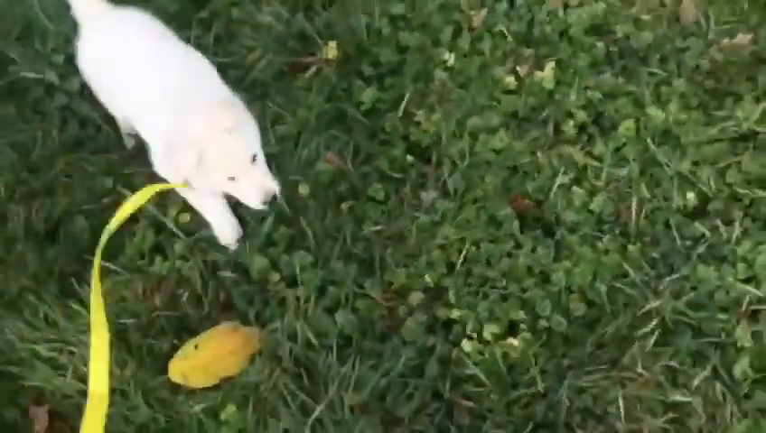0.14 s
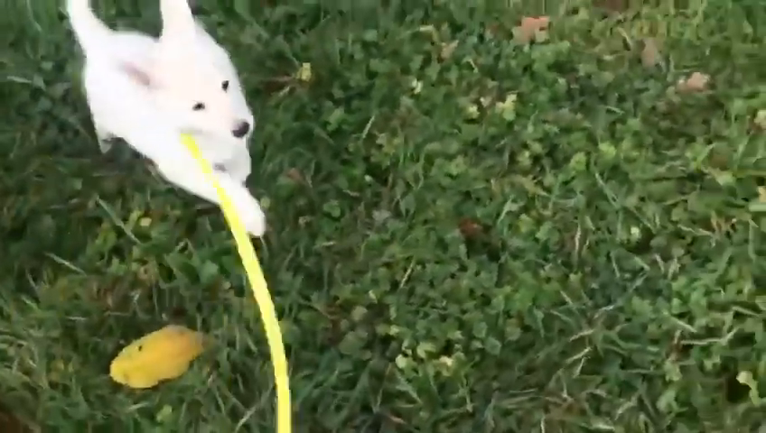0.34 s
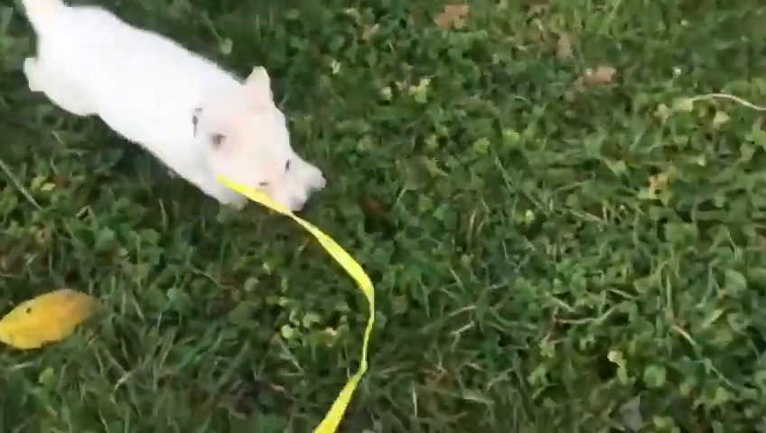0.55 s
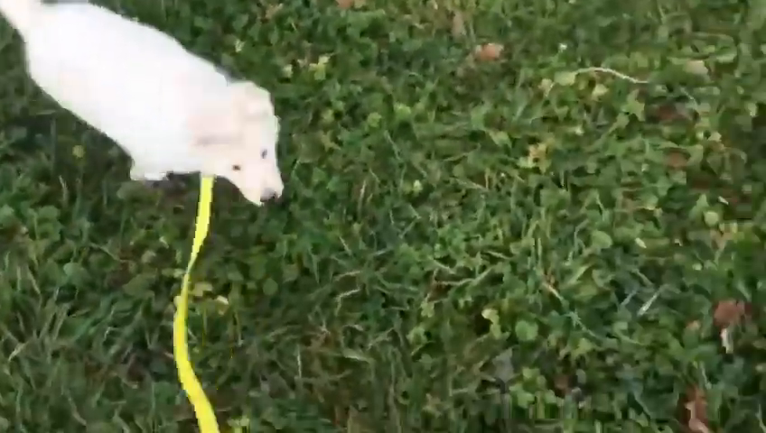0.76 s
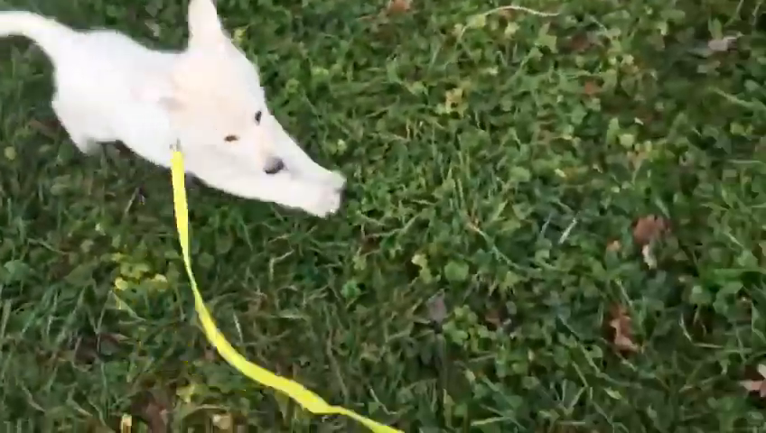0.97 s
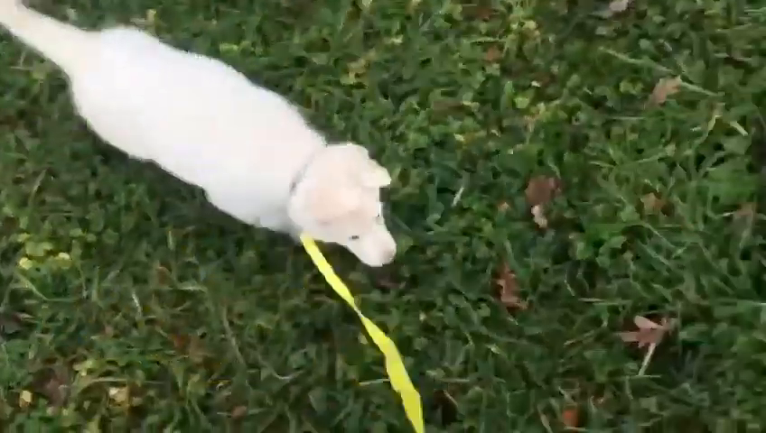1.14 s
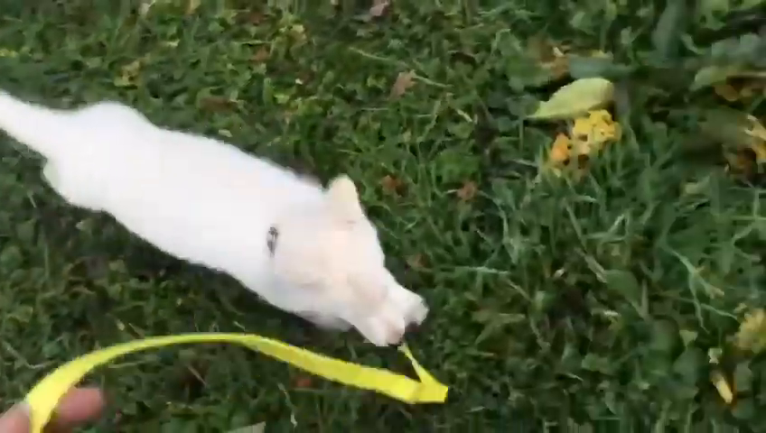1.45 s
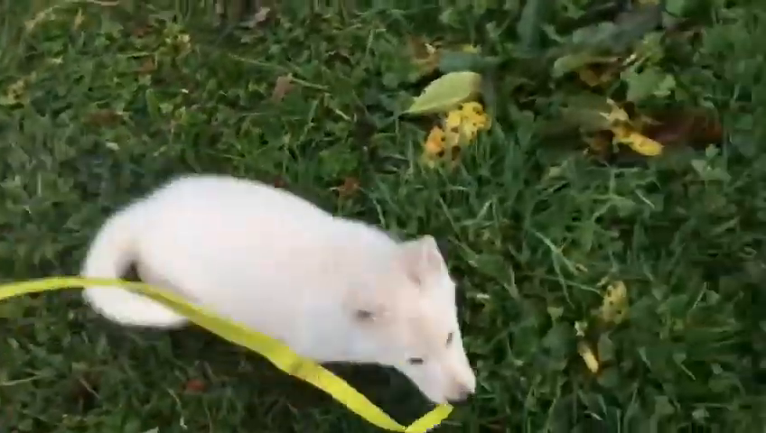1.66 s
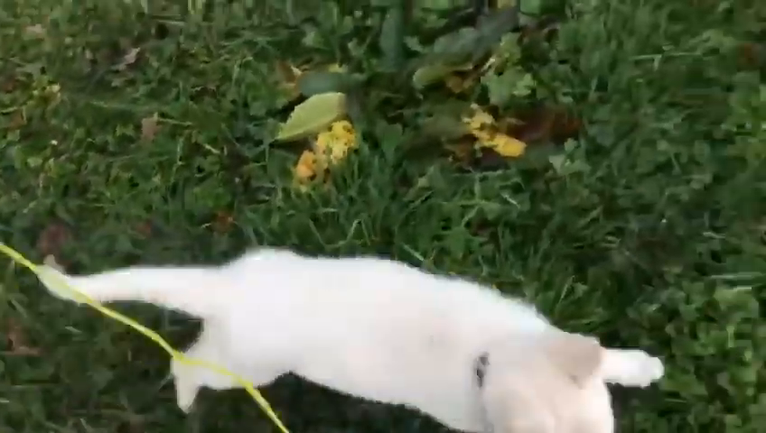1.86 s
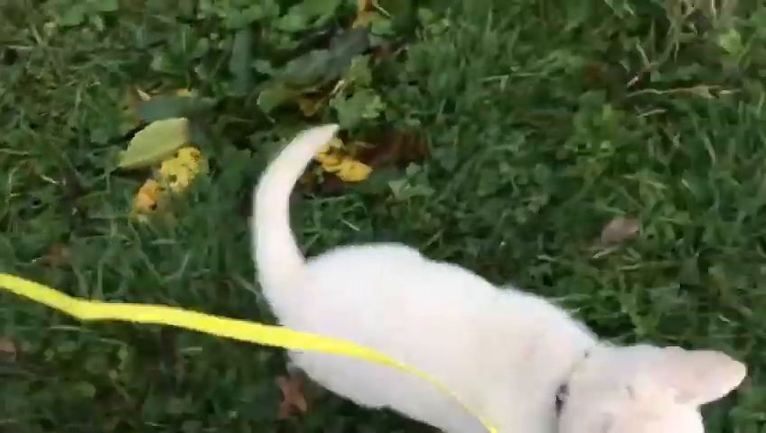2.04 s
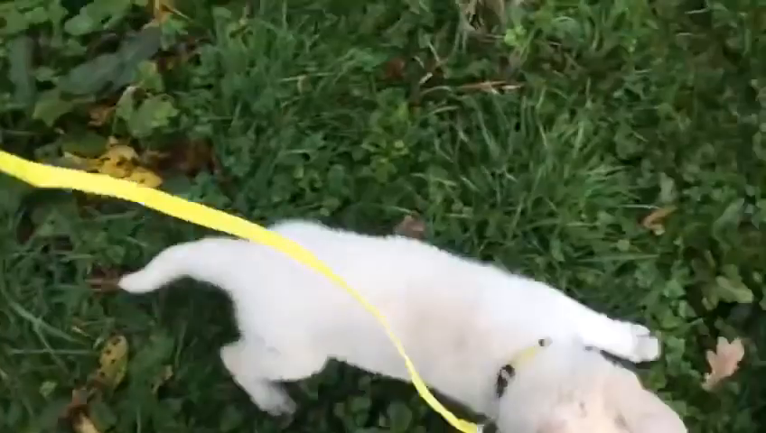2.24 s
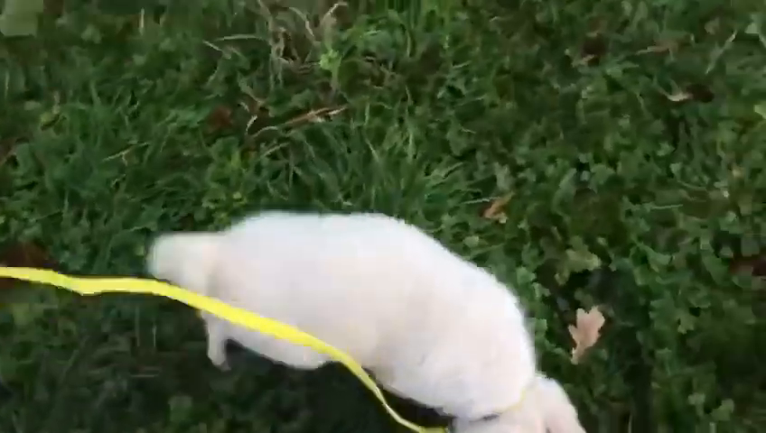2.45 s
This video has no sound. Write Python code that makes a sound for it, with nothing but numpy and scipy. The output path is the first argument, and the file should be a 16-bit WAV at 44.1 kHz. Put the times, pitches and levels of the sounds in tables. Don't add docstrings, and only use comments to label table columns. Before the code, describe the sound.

Dull footsteps thud on grass, close to the microphone. A dense burst of low, soft thumps runs from 0.2 to 0.7 seconds, strongest near 0.2 to 0.3, then weaker treads and light paw falls until 1.4. A firm double thud lands around 1.9. Grass swishes, leaves scrape and stems snap, notably near 0.7, 1.1, 1.5 and 2.3. Distant traffic hums, with a faint wavering motor whine fading after 1.7.

```python
import sys
import numpy as np
from scipy import signal
from scipy.io import wavfile
from scipy.ndimage import uniform_filter1d

SR = 44100
rng = np.random.default_rng(int(sys.argv[2]) if len(sys.argv) > 2 else 0)


def master(y):
    cut = np.clip(np.atleast_2d(y).T, -1, 1)
    pcm = np.round(cut * 32767)
    wavfile.write(sys.argv[1], SR, pcm.astype(np.int16))


def makeup_ratio(level_db):
    decades = np.asarray(level_db, float) / 20
    return 10 ** decades


N = 114660
T = np.arange(N) / SR


def rms_one(x):
    return x / np.sqrt(np.mean(x ** 2) + 1e-20)


def in_time(rows):
    return np.interp(T, *np.transpose(rows))


def at_hz(points, hz):
    table_hz, table_db = np.transpose(points)
    return np.interp(np.log(hz), np.log(table_hz), table_db)


def drift(rate_hz):
    r = np.exp(-40 * np.pi * rate_hz / SR)
    noise = rng.standard_normal(N // 20 + 2002)
    slow = rms_one(signal.lfilter([1], [1, -2 * r, r * r], noise)[2000:])
    return np.interp(np.arange(N) / 20, np.arange(len(slow)), slow)


def resonate(x, hz, width_hz):
    r = np.exp(-np.pi * width_hz / SR)
    feed = np.array([1, 0, -1]) * (1 - r * r) / 2
    return signal.lfilter(feed, [1, -2 * r * np.cos(2 * np.pi * hz / SR), r * r], x)


def resonate_twice(x, hz, width_hz):
    return resonate(resonate(x, hz, width_hz), hz, width_hz)


def bands(sources):
    edges = 30 * 2 ** np.arange(0, 8.9, 1 / 3)
    out = []
    for k, (low_hz, high_hz) in enumerate(zip(edges, edges[1:])):
        sos = signal.butter(2, [low_hz, high_hz], "band", fs=SR, output="sos")
        out.append((np.sqrt(low_hz * high_hz), signal.sosfilt(sos, sources[k % 2])))
    return out


def lump(s, hz, cycles):
    turn = (T[::10] - s) * hz
    no_push = np.exp(-2 * (np.pi * cycles) ** 2)
    return np.exp(-0.5 * (turn / cycles) ** 2) * (np.cos(2 * np.pi * turn) - no_push)


# time_s, peak_db, pitch_hz, push (1) or
FOOTFALLS = [(0.172, -37, 128, -0.84), (0.1971, -18, 92, 0.87), (0.2369, -28.5, 84, 0.74),
             (0.2571, -20.5, 136, 1), (0.2692, -19.5, 71.5, -1), (0.2763, -26.5, 61, 0.97),
             (0.246, -34, 90, 1), (0.3284, -33, 61.4, -1), (0.3346, -34, 70, 0.9), (.3487, -27.5, 80.6, 0.95),
             (0.4107, -28, 79.4, -0.83), (0.4359, -23.5, 124, 0.72), (0.455, -24.5, 90.5, -0.89),
             (0.483, -27.5, 98, -0.68), (0.5069, -34, 100, 0.94), (.5236, -41, 110, 0.87),
             (0.5350, -42, 120, 0.91), (0.5715, -29, 65, 0.75), (.594, -28.5, 118, 0.83),
             (.623, -31.5, 138, 0.95), (0.6402, -32.5, 110, 1), (0.6477, -33, 120, 1),
             (0.6604, -27.5, 113, -0.91), (.666, -36, 85, 1), (0.727, -37, 94, 0.91), (0.7841, -44, 100, 0.88),
             (0.909, -43.5, 117, 0.88), (0.974, -39, 89, -1), (0.998, -36, 100, -1), (1.0084, -37, 108, 0.85),
             (1.0641, -36.5, 84, -0.91), (1.083, -40, 60, -1), (1.142, -41, 85, -0.84),
             (1.1519, -35, 64, 0.86), (1.164, -42, 70, 1), (1.2126, -36.5, 90.5, 0.88),
             (1.219, -38, 72, -0.89), (1.3963, -37, 86, 0.8), (1.401, -41, 101, -1), (1.9089, -29, 74, -1.04),
             (1.9215, -23, 113, -0.97), (2.0816, -33.5, 87.6, -0.83), (2.444, -45, 90, -0.67),
             (2.449, -37, 68.6, 0.9), (2.5367, -45, 100, 0.83), (2.54, -41.5, 89, -0.95),
             (0.058, -38, 80.4, 0.62), (0.138, -37, 85, -0.75), (0.3724, -46, 89, 1),
             (1.6216, -49.5, 100, 1), (1.043, -42, 105, 1), (1.435, -54, 70, -0.75),
             (1.194, -39.5, 106, -1), (1.2418, -38, 104, 1), (1.309, -47, 110, 0.87), (1.362, -39, 108, 1),
             (1.448, -41, 69, -1.05), (1.645, -41, 65, -1.1), (1.733, -45, 100, -0.94),
             (1.772, -42, 89, -1), (1.788, -49, 94, -0.84), (1.868, -46, 70, -0.83),
             (1.9, -34.5, 107, -1.17), (1.943, -40, 70, 1), (2.023, -47, 89.5, -0.89), (2.126, -42, 60, 1),
             (2.408, -44, 121, 0.92), (2.4812, -37, 133, -0.88), (2.4923, -43, 90, 0.92),
             (2.515, -38.5, 123, -0.83)]
# time_s, peak_db, pitch_hz
HARD_KNOCKS = [(.2610, -45, 430), (0.342, -39, 187), (0.464, -40.5, 327), (0.475, -36.5, 207),
               (.5300, -44, 171), (.6210, -40, 433), (.6220, -39.5, 257), (1.4650, -48, 516),
               (1.9150, -38, 490), (1.92, -41.5, 348)]
THUD_CYCLES, KNOCK_CYCLES = 0.33, 1.26
EDGE_DB, EDGE_RATIO = -18.5, 3.45
WEIGHT_DB, WEIGHT_RATIO = -7, 0.63


def thuds():
    low = 0
    for s, db, hz, way in FOOTFALLS:
        body = lump(s, hz, THUD_CYCLES)
        edge = makeup_ratio(EDGE_DB) * lump(s, hz * EDGE_RATIO, THUD_CYCLES)
        weight = makeup_ratio(WEIGHT_DB) * lump(s, hz * WEIGHT_RATIO, THUD_CYCLES)
        low = low + way * makeup_ratio(db) * (body + edge + weight)
    for s, db, hz in HARD_KNOCKS:
        low = low + makeup_ratio(db) * lump(s, hz, KNOCK_CYCLES)
    return signal.resample_poly(low, 10, 1)[:N]


# time_s, level_db
JOSTLE_LEVEL = [(0, -53.5), (.13, -49), (.2, -40.5), (.3, -42.5), (.55, -46), (.68, -48), (.76, -56.5),
                (.92, -71), (1.0, -53.5), (1.3, -51.5), (1.55, -54), (2.3, -62), (2.6, -53)]
JOSTLE_HZ, LUMP_DB, LUMPS_PER_S = (45, 143.6), 3.5, 43


def jostle():
    sos = signal.butter(3, JOSTLE_HZ, "band", fs=SR, output="sos")
    low = signal.sosfilt(sos, rng.standard_normal(N + SR))[SR:]
    return makeup_ratio(in_time(JOSTLE_LEVEL)) * rms_one(low * makeup_ratio(LUMP_DB * drift(LUMPS_PER_S)))


# start_s, length_s, level_db, brightest_hz
GRASS_BRUSHES = [(0, 0.0069, -57, 6060), (0.05, 0.079, -61, 5970), (0.134, 0.039, -56, 6900),
                 (0.163, 0.0074, -50, 3200), (0.427, 0.075, -64.5, 6100), (0.488, 0.032, -60.5, 6140),
                 (0.524, 0.33, -58, 5830), (0.607, 0.057, -55.5, 9300), (0.617, 0.098, -49, 3560),
                 (0.702, 0.068, -53, 3240), (0.761, 0.062, -56.5, 5940), (0.958, 0.075, -57.5, 5000),
                 (1.042, 0.063, -55.5, 5840), (1.131, 0.088, -62, 6100), (1.244, 0.053, -60.5, 8000),
                 (1.297, 0.24, -60.5, 6100), (1.402, 0.12, -51, 7000), (1.493, 0.14, -56, 4300),
                 (1.639, 0.06, -55, 6700), (1.686, 0.066, -54, 6750), (1.812, 0.071, -56, 4900),
                 (1.881, 0.18, -59, 7100), (2.35, 0.12, -63, 4960), (2.076, 0.098, -58, 3130),
                 (2.185, 0.047, -55, 6240), (2.256, 0.067, -56.5, 7000), (2.33, 0.02, -59, 7950),
                 (2.46, 0.13, -59.5, 6700), (2.559, 0.037, -55, 7500)]
# pitch_hz, level_db (per Hz)
GRASS_COLOUR = [(700, 4.5), (1500, 6), (3000, 0.5), (5000, -4.5), (7000, -2), (9000, -0.5), (11500, 1)]
BLADES_PER_S, BLADE_SPREAD_DB, BLADE_SHARE = 4700, 5, 0.66
ATTACK_S, ATTACK_SHARE, RELEASE_S = 0.00094, 0.22, 0.008
BRIGHT_OCTAVES, BRIGHT_PEAK_DB = 0.42, 6.5


def grass():
    hit = rng.random((2, N)) < BLADES_PER_S / SR
    strength = makeup_ratio(BLADE_SPREAD_DB * np.minimum(rng.exponential(1, (2, N)), 5))
    ticks = hit * strength * rng.choice([-1, 1], (2, N))
    source = BLADE_SHARE * rms_one(ticks) + rng.standard_normal((2, N))

    s, length, db, bright_hz = np.transpose(GRASS_BRUSHES)[:, :, None]
    t = T[::32]
    rise = np.clip((t - s) / (ATTACK_S + ATTACK_SHARE * length), 0, 1)
    fade = np.exp(-np.maximum(t - s - length, 0) / RELEASE_S)
    shape = rise * fade * makeup_ratio(db)

    out, together = 0, drift(71)
    for hz, band in bands(source)[12:]:
        octaves_off = np.log2(hz / bright_hz)
        bright = makeup_ratio(BRIGHT_PEAK_DB * np.exp(-0.5 * (octaves_off / BRIGHT_OCTAVES) ** 2))
        level = np.interp(T, t, np.sqrt(np.sum((shape * bright) ** 2, axis=0)))
        flutter_db = 0.88 * together + 1.8 * drift(44)
        out = out + band * level * makeup_ratio(at_hz(GRASS_COLOUR, hz) + flutter_db)
    return out


# time_s, peak_db, pitch_hz, width_hz
STEM_SNAPS = [(0.143, -38, 6500, 1400), (.665, -46, 4300, 1800), (0.752, -59, 2770, 1500),
              (1.1175, -35, 9500, 1500), (1.1205, -42.5, 6000, 2000), (1.337, -40, 2370, 2590),
              (1.402, -35.5, 805, 1200), (1.466, -38, 3600, 2500), (1.471, -38, 6200, 2000),
              (1.497, -39, 5300, 1400), (1.523, -42, 3020, 1500), (1.651, -43, 2500, 5000),
              (2.292, -44, 1200, 1500), (2.301, -36, 1000, 1500), (2.319, -41, 1200, 1600),
              (2.327, -39.5, 700, 900), (2.348, -44.5, 8700, 2500), (2.355, -41.5, 1200, 1800)]
SNAP_FADE_S, SNAP_LENGTH = 0.0012, 600


def snaps():
    out = np.zeros(N)
    n = np.arange(SNAP_LENGTH)
    fade = np.exp(-n / SR / SNAP_FADE_S)
    for s, db, hz, width_hz in STEM_SNAPS:
        i = int(s * SR)
        click = (n == 0) + 0.25 * rng.standard_normal(SNAP_LENGTH) * fade
        burst = resonate_twice(click, hz, width_hz)
        out[i:i + SNAP_LENGTH] += makeup_ratio(db) * burst / np.abs(burst).max()
    return out


# middle_s, length_s, level_db, pitch_hz
LEAF_SCRAPES = [(.158, 0.029, -54, 6800), (0.174, 0.0088, -55.5, 4000), (0.498, 0.019, -62, 5950),
                (0.65, 0.025, -63, 9400), (0.673, 0.042, -55, 5970), (0.698, 0.037, -54, 4900),
                (0.744, .022, -54, 2900), (.748, 0.011, -51, 7200), (0.742, 0.031, -53.5, 4840),
                (0.807, 0.033, -55, 5300), (.81, 0.029, -58, 8300), (1.005, 0.018, -65, 4340),
                (1.475, .03, -55, 4200), (1.472, 0.058, -54, 9300), (1.588, 0.022, -64, 3000),
                (1.729, .026, -55.5, 3900), (1.731, .026, -53, 5900), (1.761, 0.018, -57.5, 7900),
                (2.218, .02, -61, 3770), (2.31, 0.025, -63, 8400), (2.574, 0.014, -50, 6770),
                (2.57, .014, -57, 3700)]
SCRAPE_WIDTH_SHARE = 0.3


def scrapes():
    out = np.zeros(N)
    grain = rng.standard_normal(N) * makeup_ratio(5.0 * rng.standard_normal(N))
    for s, length, db, hz in LEAF_SCRAPES:
        span = slice(max(int((s - length) * SR), 0), int((s + length) * SR))
        band = rms_one(resonate_twice(grain[span], hz, SCRAPE_WIDTH_SHARE * hz))
        out[span] += makeup_ratio(db) * band * np.exp(-(2 * (T[span] - s) / length) ** 4)
    return out


# pitch_hz, level_db (per Hz)
FAR_AIR = [(40, -6), (118, -6), (262, -13.5), (600, -10), (1000, -6), (1700, -15.5), (2800, -26),
           (11500, -30)]
# time_s, level_db
TRAFFIC_SWELL = [(0, 0.5), (.5, 0.5), (.9, -0.5), (1.5, 1.5), (2.25, 1.5), (2.6, -1)]
# pitch_hz, width_hz, start_db, swell_db, end_db
TRAFFIC_WHINES = [
    (671.8, 18, -64, -61, -65),
    (556, 37, -74, -63, -77),
    (119, 22, -59.5, -59.5, -62),
    (60, 8.3, -56.5, -57, -59.5),
]
AIR_DB, WHINE_SWELL_S = -50, 0.8


def traffic():
    far = 0
    for hz, band in bands(rng.standard_normal((2, N))):
        far = far + band * makeup_ratio(at_hz(FAR_AIR, hz) + 2.34 * drift(7.0))
    out = makeup_ratio(AIR_DB + in_time(TRAFFIC_SWELL)) * rms_one(far)
    for hz, width_hz, *levels_db in TRAFFIC_WHINES:
        level_db = np.interp(T, [0, WHINE_SWELL_S, T[-1]], levels_db) + 2.6 * drift(6.3)
        whine = resonate_twice(rng.standard_normal(N + SR), hz, width_hz)[SR:]
        out = out + makeup_ratio(level_db) * rms_one(whine)
    return out


# time_s, level_db
MOTOR_LEVEL = [(0, -52), (.06, -53), (.15, -54.5), (.22, -67), (.31, -54.5), (.42, -60), (.51, -49.5),
               (.57, -63), (.7, -58), (.85, -60.5), (1.1, -62), (1.28, -56), (1.38, -69), (1.52, -52),
               (1.6, -67), (1.68, -59), (1.82, -73), (2.6, -77)]
MOTOR_HZ, WAVER_HZ, FLUTTER_DB = 983, 11, 2.5


def motor():
    phase = 2 * np.pi * np.cumsum(MOTOR_HZ + WAVER_HZ * drift(13.0)) / SR
    return np.sqrt(2) * makeup_ratio(in_time(MOTOR_LEVEL) + FLUTTER_DB * drift(42)) * np.sin(phase)


def scene():
    near = thuds() + jostle() + grass() + snaps() + scrapes()
    return (near + traffic() + motor())[None]


def low_pass(x):
    return signal.sosfilt(signal.butter(12, 11200, fs=SR, output="sos"), x)


# start_s, end_s
TOP_BAND_SPANS = [(.08, .14), (.35, .53), (.74, .82), (1.05, 1.14), (1.25, 1.3), (1.5, 1.56), (1.89, 2.0),
                  (2.15, 2.35), (2.48, 2.6)]
LOW_CUT_HZ, ROLL_OFF_HZ, CUTOFF_HZ = 38, 10450, 10680
TOP_STEP_DB, TOP_BAND_DB = 45, -7


def record(dry):
    x = signal.sosfiltfilt(signal.butter(2, LOW_CUT_HZ, "high", fs=SR, output="sos"), dry)
    x = signal.sosfilt(signal.butter(16, ROLL_OFF_HZ, fs=SR, output="sos"), x)
    above = signal.ellip(4, 0.5, TOP_STEP_DB, [CUTOFF_HZ, 11150], "band", fs=SR, output="sos")
    below = signal.ellip(10, 0.5, TOP_STEP_DB, CUTOFF_HZ, fs=SR, output="sos")
    is_open = sum(1.0 * (T > start) * (T < end) for start, end in TOP_BAND_SPANS)
    leak = signal.sosfilt(above, x) * makeup_ratio(TOP_BAND_DB) * uniform_filter1d(is_open, size=900)
    return low_pass(signal.sosfilt(below, x) + leak)


dry = scene()
out = record(dry)
master(out)
```